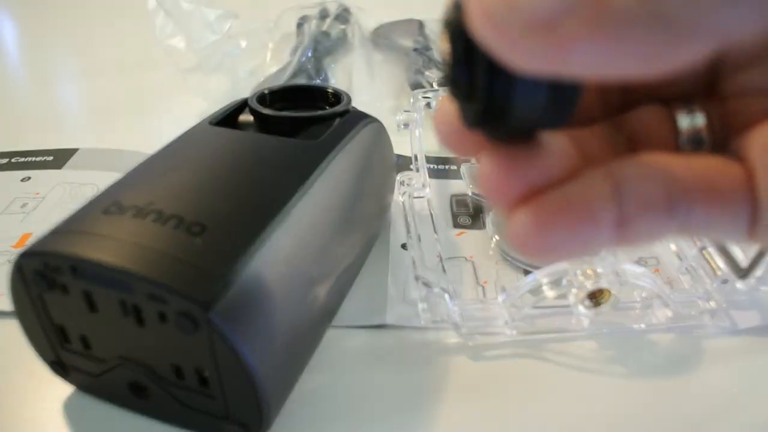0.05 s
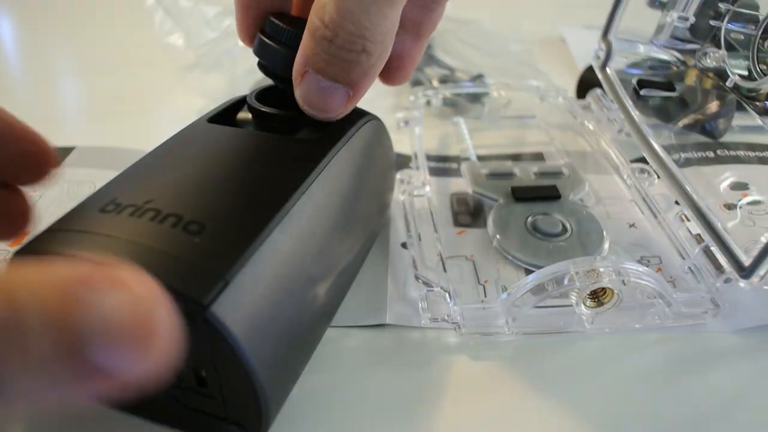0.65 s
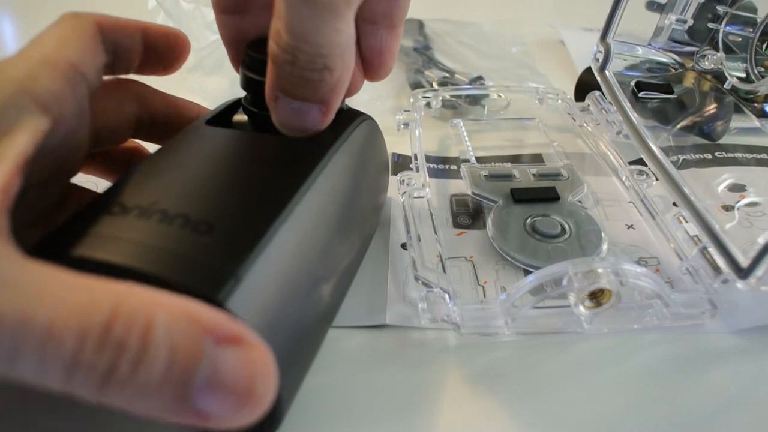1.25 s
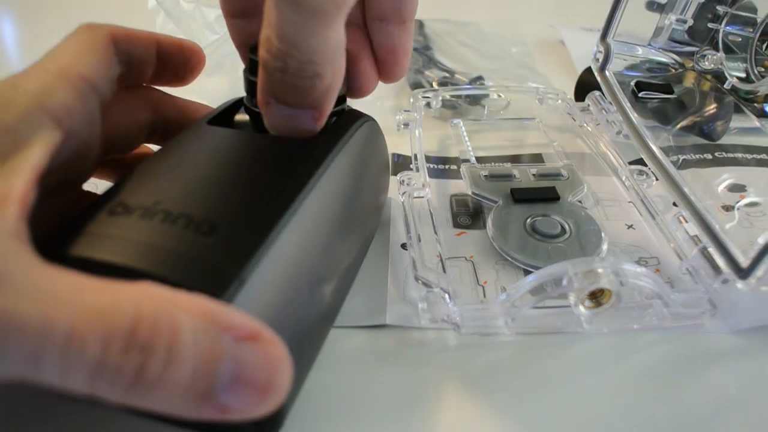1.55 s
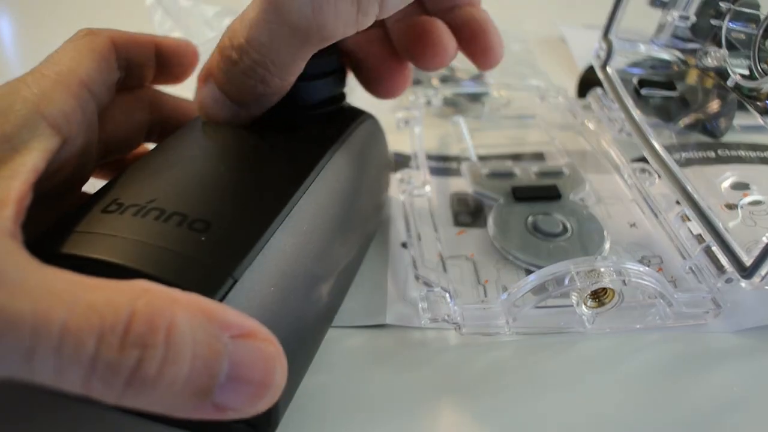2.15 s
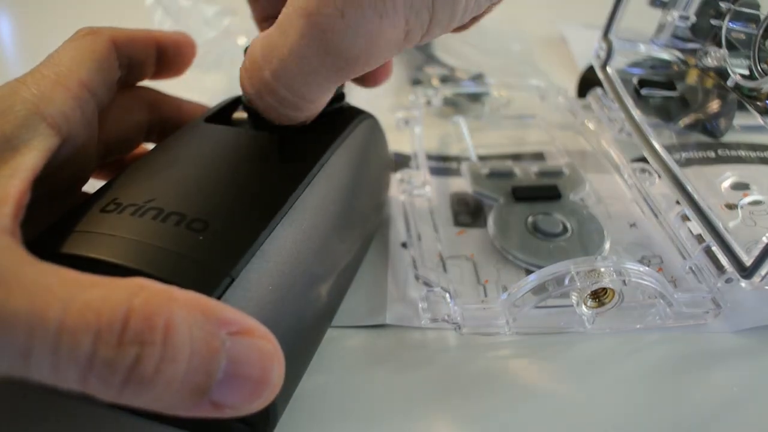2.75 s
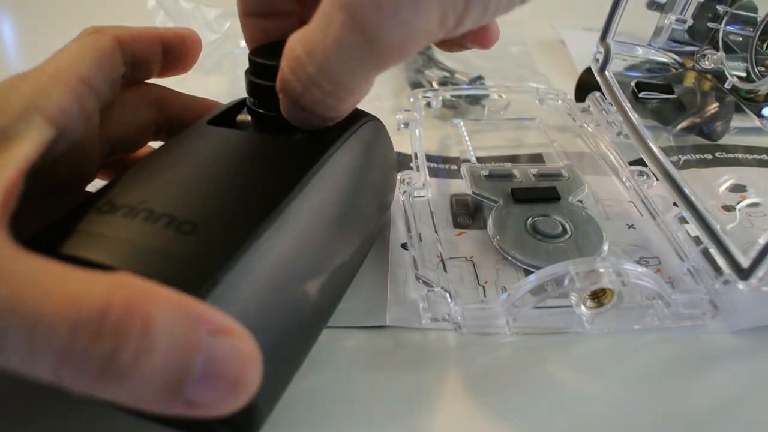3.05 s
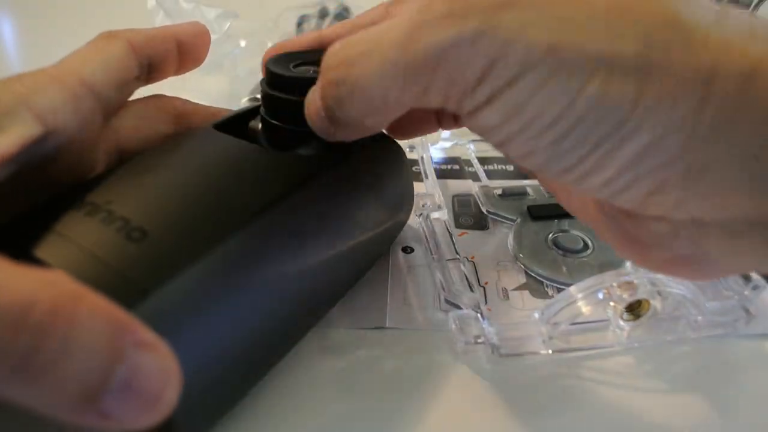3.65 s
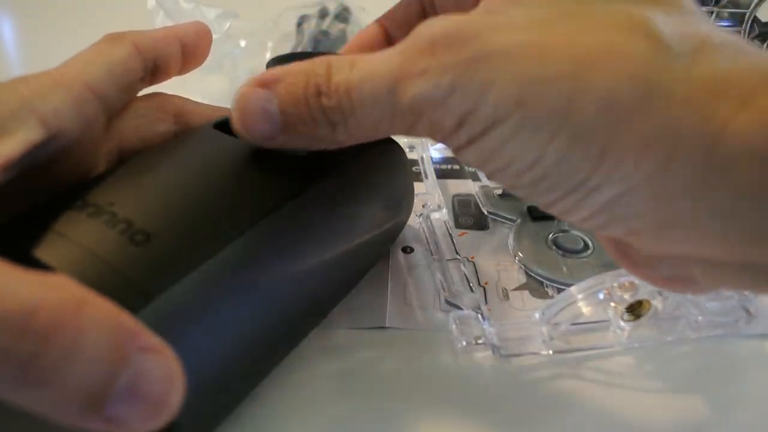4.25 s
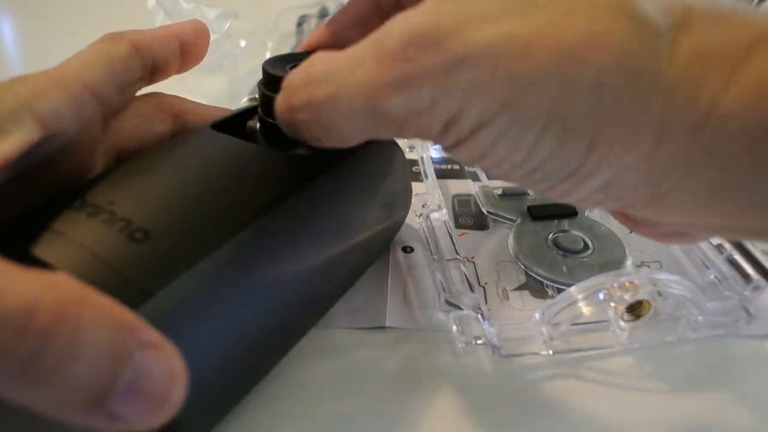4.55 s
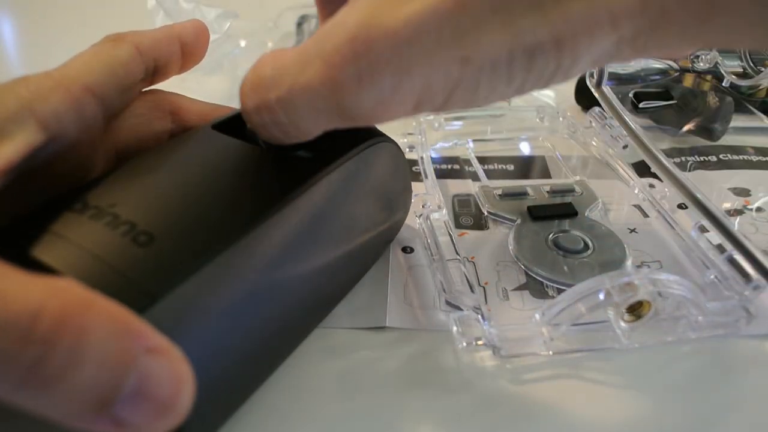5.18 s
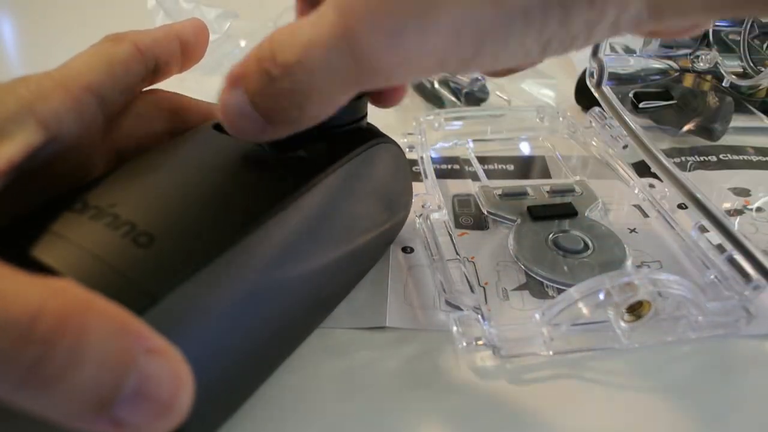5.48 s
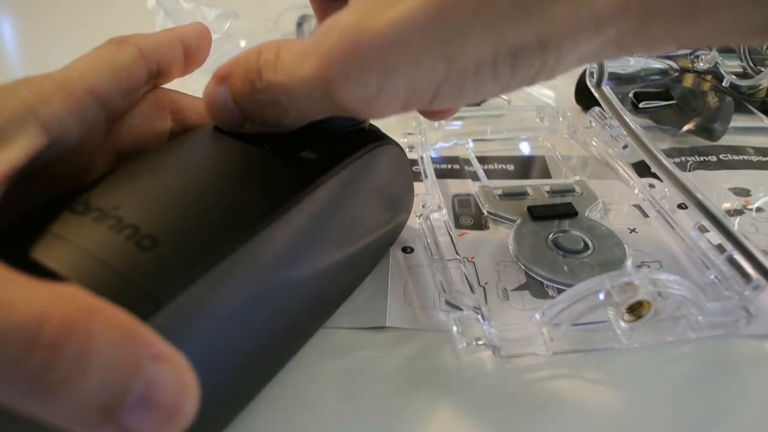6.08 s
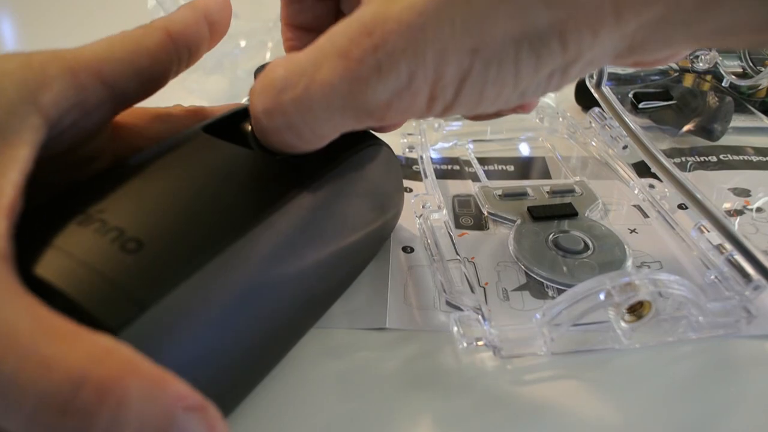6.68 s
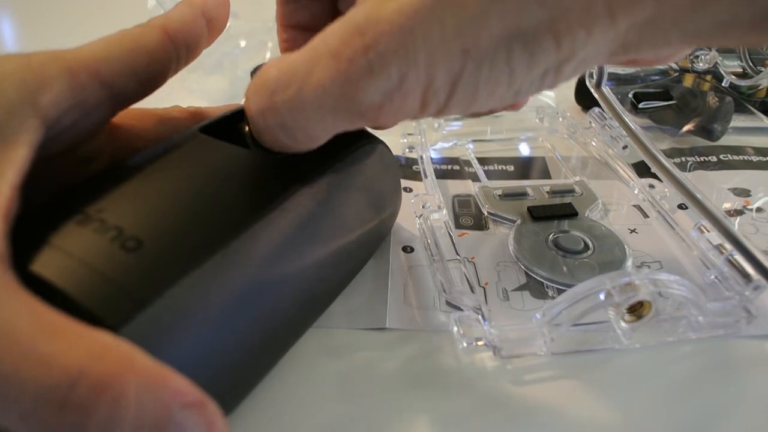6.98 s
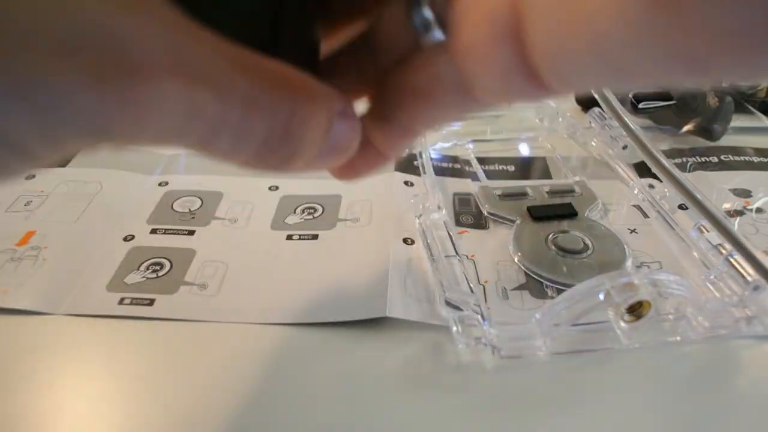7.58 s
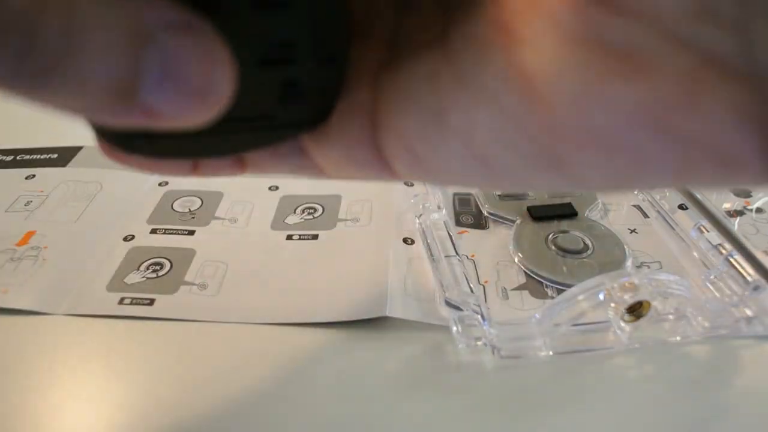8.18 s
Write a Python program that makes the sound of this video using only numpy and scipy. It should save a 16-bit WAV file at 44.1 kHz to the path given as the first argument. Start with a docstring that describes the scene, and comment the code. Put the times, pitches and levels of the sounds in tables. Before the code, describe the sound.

A small lens is twisted into a hollow plastic camera body, rasping and clicking close by over faint hiss.

```python
"""A quiet small room, one microphone close to the hands: a small lens is screwed into a hollow plastic
camera body. First, a little farther off, a plastic part is set down and rings the table top. Then the
thread rasps in quick twists and clicks as it catches, ringing the shell, while fingers bump the body
and nails tick on its rim. At the end the hands slide over the case and pick it up.
Under it all lie steady hiss, a faint high whine now and then, and a low hum that rises late."""
import sys
import numpy as np
from scipy import signal
from scipy.fft import rfft, irfft, next_fast_len
from scipy.io import wavfile
from scipy.ndimage import uniform_filter1d, map_coordinates

SR = 44100
rng = np.random.default_rng(int(sys.argv[2]) if len(sys.argv) > 2 else 0)


def unload_wav(signal):
    """Save mono or channel-first audio to the path in sys.argv[1] as 16-bit WAV at rate SR, clipped to [-1, 1]."""
    wavfile.write(
        sys.argv[1],
        SR,
        np.round(np.clip(np.atleast_2d(signal).T, -1, 1) * 32767).astype(np.int16),
    )


N = 367344

# twists of the lens, slow at first while the thread is sought: t/s, length/s, level/dB
TWISTS = [(0.822, 0.068, -49.5), (0.938, 0.057, -50), (1.017, 0.039, -33), (1.057, 0.016, -39.5),
          (1.085, 0.028, -44), (1.135, 0.098, -47), (1.408, .055, -45), (1.473, .01, -38),
          (1.551, 0.19, -47.5), (1.722, 0.089, -36.5), (1.858, 0.11, -41), (1.975, 0.099, -44),
          (2.101, 0.074, -46.5), (2.178, 0.041, -39), (2.448, 0.04, -32), (2.509, 0.044, -28),
          (2.549, .032, -25), (2.744, 0.024, -41), (2.786, 0.075, -44.5), (3.256, 0.054, -40),
          (3.474, 0.11, -42), (3.743, 0.077, -44), (3.962, 0.084, -41.5), (4.2, 0.07, -38),
          (4.407, 0.059, -39), (4.591, .058, -37), (4.775, 0.021, -39.5), (4.819, 0.026, -35.5),
          (4.968, 0.091, -37), (5.175, 0.07, -37.5), (5.384, 0.093, -40.5), (5.596, .035, -40.5),
          (5.647, .02, -32.5), (5.806, 0.055, -32.5), (5.999, 0.062, -46), (6.09, 0.026, -30),
          (6.246, .03, -29.5), (6.554, 0.0348, -49.5)]
# the lens knocks and catches in its mount: t/s, level/dB, hollow low end/dB, treble/dB
CATCHES = [(1.1427, -28.5, 12.5, -4.5), (1.208, -34, 15.5, -7), (1.214, -39, 15, -18),
           (1.2695, -34, 12.5, -4), (1.277, -24, 2, -55), (1.4777, -38.5, 2, 2), (1.497, -35, 8, 3),
           (1.5063, -22.5, 3.5, -16), (2.4333, -21, -6.5, -11), (3.2071, -37.5, -4, -9),
           (3.7319, -40.5, 11, 0), (4.0864, -39.5, 21.5, -14), (4.604, -31.5, 6.5, -10),
           (4.707, -42.5, 15, -5), (4.7989, -31.5, 7.5, -24), (5.027, -28.5, -2.5, -23),
           (5.2248, -25.5, 2, -55), (5.234, -29.5, 11, 2), (5.48, -29.5, 1, -15), (5.6651, -23, 3.5, -11),
           (5.792, -35.5, 5, -4), (6.094, -30.5, -6, -8), (6.2426, -24, 10, -12), (6.261, -26, 9.5, -25)]


def amp(db):
    """Decibels to gain."""
    return 10 ** (np.asarray(db) / 20)


def unit(x):
    """Scale to rms 1."""
    return x / np.sqrt(np.mean(x ** 2) + 1e-20)


def along(points, hz):
    """Read (f/Hz, value) points on a log frequency axis."""
    f, values = np.transpose(points)
    return np.interp(np.log(hz + 1), np.log(f), values)


def seconds(length):
    """A time axis."""
    return np.arange(int(length * SR)) / SR


def add(track, s, sound):
    """Mix a sound in from time s."""
    start = round(s * SR)
    part = sound[max(-start, 0):max(N - start, 0)]
    track[max(start, 0):][:len(part)] += part


def wobble(rate):
    """A smooth random curve, rate knots a second."""
    knots = rng.standard_normal(int(N * rate / SR) + 4)
    return map_coordinates(knots, [np.arange(N) * rate / SR])


def coloured(x, gain):
    """Minimum-phase filter whose gain is a function of frequency."""
    size = 2 * next_fast_len(len(x) // 2 + 2048)
    hz = np.fft.rfftfreq(size, 1 / SR)
    cepstrum = irfft(np.log(np.maximum(gain(hz), 1e-6)))
    cepstrum[1:size // 2] *= 2
    cepstrum[size // 2 + 1:] = 0
    return irfft(rfft(x, size) * np.exp(rfft(cepstrum)))[:len(x)]


def resonances(modes, hz):
    """Gain of (f/Hz, width/Hz, level/dB) resonances whose powers add."""
    f = hz + 1
    return np.sqrt(sum(amp(db) ** 2 / (1 + ((f * f - c * c) / (f * w)) ** 2) for c, w, db in modes))


def sized(hit, db):
    """Give a hit the energy of 7 ms of sound at this level."""
    return amp(db) * hit / np.linalg.norm(hit) * np.sqrt(.007 * SR)


def room_tone():
    """Steady hiss, a low hum that rises late, and a faint whine that comes and goes."""
    # spectrum of the hiss: f/Hz, density/dB
    hiss_spectrum = [(12, -31), (20, -11), (66, 1.5), (196, -5.5), (342, -4.5), (549, -7), (667, -7),
                     (811, -7), (958, -7), (2150, -10.5), (3260, -11.5), (8640, -13.5), (15500, -16)]
    # spells of the whine: start/s, end/s
    whine_spells = [(0, .11), (.32, .42), (.89, .93), (2.87, 2.94)]
    t = np.arange(N) / SR
    hiss = amp(-54) * unit(coloured(rng.standard_normal(N), lambda hz: amp(along(hiss_spectrum, hz))))
    hum_hz, hum_db = 44.5, np.interp(t, [5.9, 6.5, 8.2], [-76, -60, -55.5])
    hum = amp(hum_db + 1.4 * wobble(6)) * np.sin(2 * np.pi * hum_hz * t + .4 * wobble(7))
    gate = sum((t > start) & (t < end) for start, end in whine_spells)
    whine = unit(coloured(rng.standard_normal(N), lambda hz: resonances([(9496, 260, 0)], hz) ** 2))
    return hiss + hum + uniform_filter1d(amp(-62) * gate, size=1200) * whine


def blow(t, chatter_t60, chatter_db, ring_t60, ring_db):
    """One sharp contact, a burst of chatter and a diffuse ring."""
    burst = lambda t60: unit(rng.standard_normal(len(t)) * amp(-60 * t / t60))
    return unit(1.0 * (t == 0)) + amp(chatter_db) * burst(chatter_t60) + amp(ring_db) * burst(ring_t60)


def table_knocks():
    """A part knocks on the table top, which rings briefly and hums on in its two lowest modes."""
    # contacts as the part is set down: t/s, level/dB, treble/dB
    knocks = [(0.2318, -50.5, 4), (.2609, -32, -25), (0.407, -33.5, -7.5), (0.4112, -38, -12),
              (.415, -40, -9), (0.4191, -17, 1), (0.4892, -40, -15), (0.4989, -24, -2)]
    # modes of the table top: f/Hz, width/Hz, level/dB
    top_modes = [(244, 27, -4), (350, 52, -10), (520, 58, -13), (720, 111, -8.5), (920, 190, -6),
                 (1160, 130, 0), (1552, 190, -2.5), (1770, 190, -12), (1910, 150, -6), (2270, 150, -7.5),
                 (2730, 210, -6), (3380, 540, -15.5), (3970, 1100, -18.5), (5640, 470, -18.5),
                 (8400, 1100, -18), (11000, 1300, -19.5), (13500, 2500, -27)]
    out, t = np.zeros(N), seconds(.25)
    board = sum(amp(level) * np.sin(2 * np.pi * hz * t) for hz, _, level in top_modes[:2])
    for s, db, treble_db in knocks:
        knock = blow(t, chatter_t60=0.012, chatter_db=-3, ring_t60=0.06, ring_db=-2.5)
        hardness = [(110, -23), (220, 4), (800, 3), (7000, treble_db)]
        ring = coloured(knock, lambda hz: resonances(top_modes, hz) * amp(along(hardness, hz)))
        add(out, s, sized(ring, db))
        add(out, s, amp(db - 20.5) * board * amp(-60 * t / 0.36))
    return out


def tilt(hz, low_db, treble_db):
    """Firm contact brings out the low end, light contact the treble."""
    return amp(along([(1500, low_db), (4000, 0.0026), (6000, 0), (11000, treble_db)], hz))


def shell(hz, s):
    """Gain of the plastic's modes at time s; sound passes mount and body, so their skirts are steep."""
    # modes of the lens mount and body: f/Hz, width/Hz, level/dB
    modes = [(495, 77, -10.5), (645, 114, -6.5), (828, 48, -1.5), (1032, 307, -2), (1378, 170, -1.5),
             (1512, 118, -1.5), (1630, 300, -8), (2025, 260, -9.5), (2675, 900, -10.5), (3744, 850, -8),
             (3980, 123, 1), (4317, 350, 0.5), (4750, 330, -0.5), (5490, 810, -3.5), (6270, 2500, -7.5),
             (7670, 200, -6), (8290, 330, -9), (9200, 1170, -7.5), (10300, 720, -11), (11310, 1220, -6),
             (12720, 3000, -14.5)]
    # the ring shifts with the lens's seat and the grip: t/s, pitch ratio
    seat = [(1.0, 0.98), (2.0, 0.99), (2.55, 1.016), (3.2, 0.99), (3.7, 1.015), (5.0, 1.003), (6.1, 0.99),
            (6.26, 0.95)]
    f = (hz + 1) / np.interp(s, *np.transpose(seat))
    grip_db = rng.normal(0, 1.6, len(modes))  # every grip damps the modes a little differently
    peak_power = sum((amp(db + grip) / (1 + ((f * f - c * c) / (f * w)) ** 2)) ** 2
                     for (c, w, db), grip in zip(modes, grip_db))
    valleys = amp(-16.5) * f / (f + 200)
    table_reflection = .22 * np.exp(-2j * np.pi * hz * .00049)  # 0.49 ms behind the direct sound
    return np.sqrt(peak_power + valleys ** 2) * np.abs(1 + table_reflection)


def stroke(s, length):
    """Speed curve of a stroke that sets in, swells, sags and is let go, and the time it begins."""
    attack, release = .011 + .26 * length, .013 + .14 * length  # s to rise or fall by 20 dB
    t = seconds(length + 2 * (attack + release)) - 2 * attack
    outside = np.maximum(np.maximum(-t / attack, (t - length) / release), 0)
    arch_db = np.interp(t / length, [0, .71, 1], [-7.5, 0, -6.5])
    return amp(arch_db - 20 * outside ** 1.5), s - 2 * attack


def friction(count, slips_per_s, grain_db):
    """Tiny random slips on a bed of smooth hiss."""
    slips = (rng.random(count) < slips_per_s / SR) * rng.standard_normal(count)
    return rng.standard_normal(count) + amp(grain_db) * unit(slips)


def thread_rasp():
    """Each twist drags the thread over its seat; it grips and slips unevenly and rings the shell."""
    # colour of the rasp as the lens sinks into the mount: t/s, low end/dB, treble/dB
    rasp_colour = [(1.03, 5, 8), (1.17, 8.5, 1.5), (1.76, 3, 0), (2.19, 6, 2.5), (2.55, -2.5, 5),
                   (2.82, 1, -2), (4.0, -1, 2.5), (5.2, -1.5, 1.5), (5.84, -9.5, 0.5), (6.26, 6.5, 2.5)]
    # two modes of the mount that sing out under the rasp: f/Hz, width/Hz, level/dB
    singing_modes = [(1470, 200, -2), (4400, 650, -5.5)]
    out = np.zeros(N)
    bite = amp(1.6 * wobble(150) + 0.67 * wobble(700))
    times, lows, trebles = np.transpose(rasp_colour)
    usual_db = -37.5
    for s, length, db in TWISTS:
        speed, begin = stroke(s, length)
        middle = s + length / 2
        effort_db = db - usual_db  # a harder twist sings more and loses treble
        low_db = np.interp(middle, times, lows)
        treble_db = np.interp(middle, times, trebles) - 0.11 * effort_db
        singing = lambda hz: np.hypot(1, amp(1.09 * effort_db) * resonances(singing_modes, hz))
        drag = friction(len(speed), slips_per_s=1200, grain_db=-5)
        drag *= bite[round(begin * SR):][:len(speed)]
        rasp = coloured(drag, lambda hz: shell(hz, middle) * singing(hz) * tilt(hz, low_db, treble_db))
        add(out, begin, amp(db) * speed * unit(rasp))
    return out


def body_bumps():
    """Fingers and the catching thread bump the hollow body: a low pulse, a shudder, a table thud."""
    # low bumps of the hollow body, from fingers or from the thread catching: t/s, level/dB, f/Hz
    low_bumps = [(.928, -45, 240), (.985, -40, 188), (1.136, -30, 290), (1.165, -36, 288),
                 (1.274, -28.5, 216), (1.309, -36, 207), (1.533, -35.5, 278), (3.099, -37.5, 200),
                 (3.193, -40, 187), (3.474, -42, 200), (3.688, -41.5, 186), (3.859, -38.5, 248),
                 (3.928, -41.5, 237), (4.086, -37, 244), (4.307, -37, 200), (4.46, -37.5, 216),
                 (4.504, -40.5, 180), (4.603, -38, 235), (4.706, -33.5, 245), (5.585, -31.5, 235),
                 (5.781, -29.5, 267), (5.969, -36.5, 186), (6.035, -37, 209), (6.232, -31.5, 238),
                 (6.326, -39, 200), (6.452, -39.5, 211), (7.037, -36.5, 234), (7.13, -34.5, 180),
                 (7.175, -34.5, 200)]
    # low modes of the hand-held case: f/Hz, width/Hz, level/dB
    case_modes = [(137, 48, -2), (200, 12, -5), (248, 14, 3.5), (325, 27, -4), (478, 78, -7.5)]
    # a jolt at each catch and a nudge somewhere in each twist: t/s, level/dB, f/Hz
    jolts = [(s, db + low_db - 16, 235) for s, db, low_db, _ in CATCHES]
    nudges = [(s + length * rng.random(), rng.normal(-49, 1), 200) for s, length, _ in TWISTS]
    lead_s = .012
    out, t = np.zeros(N), seconds(.2) - lead_s
    case = lambda hz: resonances(case_modes, hz) / (1 + (hz / 700) ** 2)
    onset = np.clip(t / 0.0047, 0, 1)
    thud = np.sin(2 * np.pi * 75 * t) * amp(-60 * t / 0.37)
    for s, db, hz in list(low_bumps) + jolts + nudges:
        push = np.exp(-((t - .004) / 0.0034) ** 2) * np.sin(2 * np.pi * (hz * t + rng.random()))
        shudder = unit(coloured(rng.standard_normal(len(t)), case)) * amp(-60 * t / 0.18)
        bump = 0.94 * push + (amp(-8) * shudder + amp(-17) * thud) * onset
        add(out, s - lead_s, amp(db) * bump)
    return out


def catch_clicks():
    """The thread creeps for an instant, then lets go; the snap rings the shell and the case panels."""
    # broad panels, shaken by a jolt but hardly by rubbing: f/Hz, width/Hz, level/dB
    panels = [(670, 140, -16), (3340, 3200, -21.5)]
    creep_s = .01
    out, t = np.zeros(N), seconds(.08)
    until_snap = seconds(creep_s)[::-1]
    for s, db, low_db, treble_db in CATCHES:
        snap = blow(t, chatter_t60=0.014, chatter_db=0.5, ring_t60=0.048, ring_db=-8.5)
        creep = amp(15) * rng.standard_normal(len(until_snap)) * amp(-60 * until_snap / 0.013)
        # a dull catch already loses some treble just above the mount's main ring
        softness = [(4400, 0), (6500, 0.18 * treble_db), (11000, 0)]
        contact = lambda hz: tilt(hz, low_db, treble_db) * amp(along(softness, hz))
        ring = lambda hz: (shell(hz, s) + resonances(panels, hz)) * contact(hz)
        click = coloured(np.concatenate([creep, snap]), ring)
        add(out, s - creep_s, sized(click, db))
    return out


def nail_ticks():
    """Fingernails flick the outer rim: dry, with none of the hollow ring."""
    # nail contacts: t/s, level/dB, treble/dB
    flicks = [(1.167, -43.5, 7), (3.176, -41, -19), (3.2531, -31.5, 8.5), (3.3611, -40, -2),
              (3.508, -38, 12.5), (4.558, -44, 15), (6.429, -40.5, 10), (6.4412, -33.5, 9),
              (7.1084, -40.5, -15), (7.128, -38.5, 5), (7.763, -39, -3), (7.833, -35.5, 34),
              (7.9487, -43, 2), (8.026, -47, 16)]
    # broad modes of the rim: f/Hz, width/Hz, level/dB
    rim_modes = [(1126, 310, 4), (2190, 740, 4), (3000, 810, -15), (4180, 1900, 0.5), (5750, 1500, 0.5),
                 (8840, 2900, -5.5), (12800, 4300, -18)]
    out, t = np.zeros(N), seconds(.05)
    for s, db, treble_db in flicks:
        flick = rng.standard_normal(len(t)) * (1 - np.exp(-t / 0.00022)) * amp(-60 * t / 0.025)
        tick = coloured(flick, lambda hz: resonances(rim_modes, hz) * tilt(hz, 0, treble_db))
        add(out, s, sized(tick, db))
    return out


def hand_slides():
    """Dry skin hisses over the plastic without ringing it."""
    # slides on the lens barrel and the case: t/s, length/s, level/dB, treble/dB
    slides = [(3.111, 0.033, -35.5, -3), (3.15, .05, -41, -2), (7.053, 0.079, -45, 5.5),
              (7.254, 0.065, -39.5, -0.5), (7.658, 0.27, -48, 2), (7.738, 0.074, -35.5, 7.5),
              (8.073, 0.027, -42, 5), (8.187, 0.088, -37.5, 9.5)]
    # spectrum of skin on plastic: f/Hz, density/dB
    skin = [(100, -13), (400, -5), (2000, -1.5), (4200, -0.5), (6000, 0), (9000, -2.5), (12000, -1.5),
            (15500, -10.5)]
    out = np.zeros(N)
    for s, length, db, treble_db in slides:
        speed, begin = stroke(s, length)
        rub = friction(len(speed), slips_per_s=790, grain_db=-5)
        hiss = coloured(rub, lambda hz: amp(along(skin, hz)) * tilt(hz, 0, treble_db))
        add(out, begin, amp(db) * speed * unit(hiss))
    return out * amp(1.8 * wobble(90))


def room(x):
    """The small room's tail, 4 ms behind the direct sound and longest in the bass."""
    # reverberation time: f/Hz, t60/s
    decay = [(200, 0.38), (1500, 0.12), (5000, 0.2), (14000, 0.039)]
    hz, t, noise = signal.stft(rng.standard_normal(SR // 2), SR, nperseg=256)
    _, tail = signal.istft(noise * amp(-60 * t / along(decay, hz)[:, None]), SR, nperseg=256)
    tail = np.pad(tail, (round(.004 * SR), 0))
    return signal.fftconvolve(x, tail / np.linalg.norm(tail))[:N]


def scene():
    """The camera is handled close to the microphone; the table knocks are farther off and wetter."""
    near = thread_rasp() + hand_slides() + catch_clicks() + nail_ticks() + body_bumps()
    far = table_knocks()
    return (near + far + amp(-24) * room(near) + amp(-10.5) * room(far) + room_tone())[None]


def record(dry):
    """The mono microphone channel passes nothing above its band limit."""
    top_hz = 15800
    size = next_fast_len(N + SR // 2)
    passband = np.fft.rfftfreq(size, 1 / SR) < top_hz
    return irfft(rfft(dry, size) * passband, size)[:, :N]


dry = scene()
out = record(dry)
unload_wav(out)
```